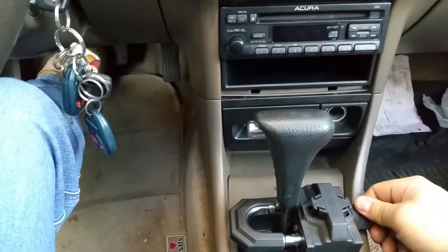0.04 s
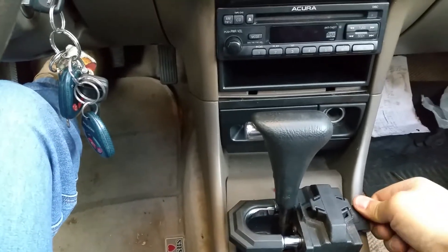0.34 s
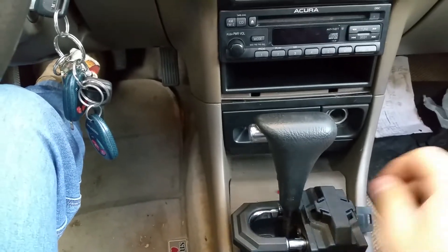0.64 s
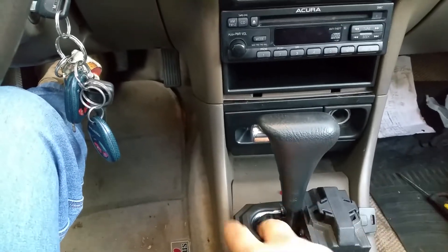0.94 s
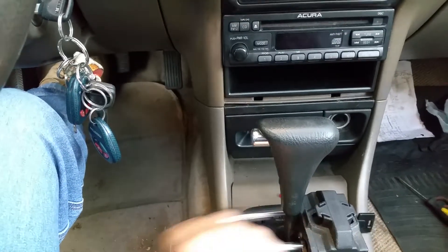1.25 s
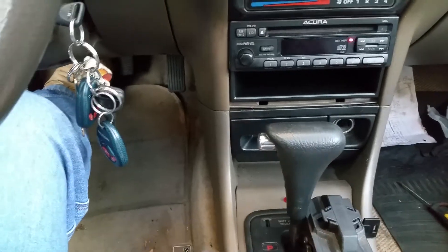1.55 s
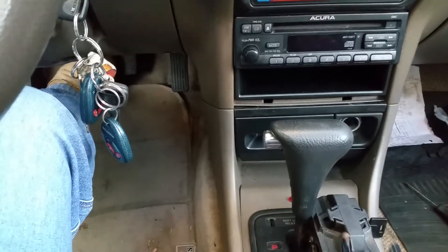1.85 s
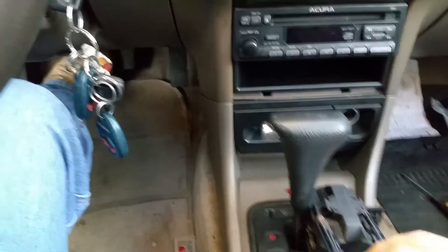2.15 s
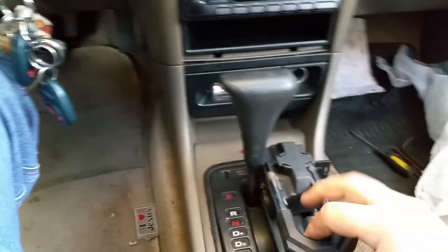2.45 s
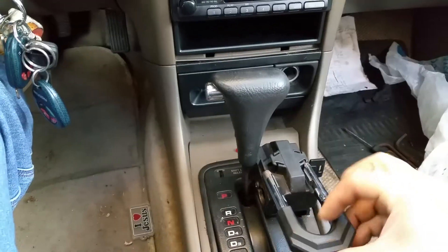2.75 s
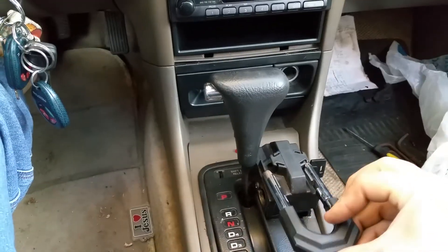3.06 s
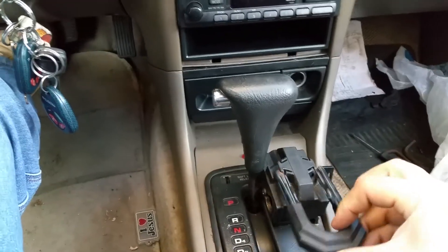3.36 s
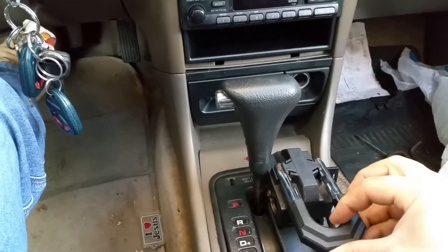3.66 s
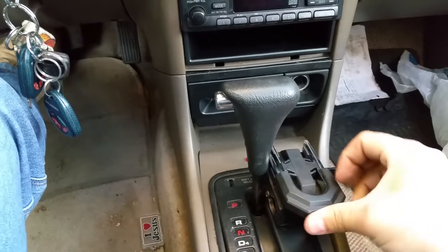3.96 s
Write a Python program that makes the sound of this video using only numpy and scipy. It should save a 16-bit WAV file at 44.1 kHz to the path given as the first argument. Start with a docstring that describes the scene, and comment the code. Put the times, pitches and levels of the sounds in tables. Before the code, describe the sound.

Close, sharp clicks and clacks come from a steel lock being unlocked, pulled off with a knock and slid back together. Between the contacts there is faint rubbing and the low hum of an idling car, heard from inside.

```python
"""Gear-lever lock in an idling car

Inside the cabin, close to a stereo microphone, a key turns and the bolt springs open. The shackle
is pulled off and knocks on the console, then slides back into the lock body and clicks home. Each
contact rings the steel and thuds in the console. Behind it the engine hums through the cabin at
multiples of its firing rate, with a thin whine and a soft hiss."""
import sys
import numpy as np
from scipy import signal
from scipy.fft import rfft, irfft, next_fast_len
from scipy.io import wavfile
from scipy.ndimage import map_coordinates

SR = 44100
rng = np.random.default_rng(int(sys.argv[2]) if len(sys.argv) > 2 else 0)


def to_wav(s):
    """Save 16-bit WAV."""
    ch = np.atleast_2d(s).T  # columns
    pcm = np.round(np.clip(ch, -1, 1) * 32767)  # PCM
    wavfile.write(sys.argv[1], SR, pcm.astype(np.int16))


N = 4 * SR

# how the lock sits in the stereo picture: f/Hz, left over right/dB
LOCK_BALANCE = [(200, 5.5), (450, 1.5), (750, 1), (1300, 5.5), (2400, 10), (3200, 7), (4500, 0.5),
                (6000, 1.5), (7500, -8), (9500, -0.5), (15000, 1)]
# lock noise at the two sides of the microphone: f/Hz, correlation
LOCK_LIKENESS = [(200, 1), (700, 0.87), (2000, 0.14), (4000, -0.22), (12000, 0.0065)]
def lock():
    """All the contacts, close up; their middle range reaches the left side more strongly."""
    noise = white(LOCK_LIKENESS)
    parts = key(noise) + knocks(noise) + latch(noise) + chirp() + bumps(noise) + touches() + thumps()
    pan = lambda hz: np.sqrt(2 / (1 + amp(np.outer([-1, 1], along(LOCK_BALANCE, hz))) ** 2))
    return amp(2.0) * filtered(parts, pan)


# key and bolt contacts: t/s, thud/dB, clack/dB, ring/dB, tick/dB
BOLT_CLICKS = [(.002, -25.5, -20, -26, -29), (.013, -32.5, -22, -25, -22.5), (0.0311, -25, -20, -25, -23.5),
               (.049, -22.5, -31, -25.5, -26.5), (.063, -25, -23, -34, -22), (.073, -20, -18, -26, -38),
               (1.323, -32, -24, -30, -49), (1.329, -33, -21, -24, -17.5), (1.337, -22, -10, -14, -17),
               (1.348, -42, -40, -26, -36)]
# spectrum of their noise: f/Hz, level/dB
BOLT_COLOUR = [(200, 4.5), (400, 5.5), (520, -22), (900, -2.5), (1080, -15.5), (1350, -15), (1600, -4),
               (2400, -1.5), (3100, -4.5), (4000, -10), (6200, -15), (7700, -11.5), (9500, -22),
               (15000, -28.5)]
# modes of key and bolt: f/Hz, level/dB
BOLT_MODES = [(1350, -9.5), (1900, -2), (2200, -5.5), (2470, 0), (2900, -2.5), (3230, -9)]
def key(noise):
    """The key turns in a run of small clicks; later the bolt springs open."""
    return contacts(noise, BOLT_CLICKS, BOLT_COLOUR, BOLT_MODES, ring_t60=0.052)


# shackle against the lever: t/s, thud/dB, clack/dB, ring/dB, tick/dB
SHACKLE_KNOCKS = [(1.387, -10, -8.5, -10.5, -22.5), (1.393, -15, -23, -26, -31),
                  (1.4084, -19.5, -21, -21.5, -37), (1.418, -23, -33, -31, -48)]
# spectrum of their noise: f/Hz, level/dB
SHACKLE_COLOUR = [(200, -16.5), (440, 5.5), (700, -5.5), (1050, -7.5), (1400, -8), (1650, -18),
                  (3200, -17.5), (4200, -17.5), (5500, -19), (7500, -25), (9500, -29.5), (15000, -34)]
# modes of the knocked shackle: f/Hz, level/dB
SHACKLE_MODES = [(1050, -7), (1960, 2), (2290, -1), (2480, 3.5), (2750, -10), (3260, -6.5)]
def knocks(noise):
    """Pulled off, the shackle strikes the lever once hard and three times more lightly."""
    return contacts(noise, SHACKLE_KNOCKS, SHACKLE_COLOUR, SHACKLE_MODES, ring_t60=0.041)


# shackle entering the lock body, then seating home: t/s, thud/dB, clack/dB, ring/dB, tick/dB
ENTRY_CLICKS = [(1.9428, -22.5, -12, -17.5, -17), (1.9471, -22.5, -11.5, -20, -22.5),
                (1.956, -20, -19, -19, -43), (2.008, -25, -29, -21, -29), (2.025, -28, -29, -29, -41),
                (2.151, -23.5, -30, -25, -32.5), (2.165, -24.5, -29, -19.5, -39.5),
                (3.4032, -17.5, -14, -15.5, -36), (3.423, -23, -10, -16.5, -24.5),
                (3.427, -23, -12.5, -24, -25)]
HOME_CLICKS = [(3.917, -18.5, -22, -32, -21.5), (3.9203, -21.5, -16.5, -19, -31)]
# spectrum of their noise: f/Hz, level/dB
BODY_COLOUR = [(200, -3.5), (400, 2), (550, -12), (760, -11), (1100, -15.5), (1400, -13.5), (1900, 1.5),
               (2550, -9.5), (2950, -1.5), (3600, -15.5), (5900, -13), (7500, -19.5), (9000, -25.5),
               (15000, -27)]
# modes of the lock body as the shackle enters, then as it seats: f/Hz, level/dB
BODY_MODES = [(1720, -9), (1800, -2), (1875, -2.5), (1935, -1.5), (2350, -9), (2870, -18.5)]
HOME_MODES = [(1250, -10), (1660, 1.5), (2050, -8), (2900, -13)]
def latch(noise):
    """The shackle clicks its way into the lock body and seats with a lower ring."""
    entering = contacts(noise, ENTRY_CLICKS, BODY_COLOUR, BODY_MODES, ring_t60=0.048)
    return entering + contacts(noise, HOME_CLICKS, BODY_COLOUR, HOME_MODES, ring_t60=0.048)


def chirp(centre_hz=12800, half_width_hz=3000):
    """The hardest latching contacts of the steel shackle add a very high, short ring."""
    times, *_, tick_db = np.transpose(ENTRY_CLICKS + HOME_CLICKS)
    levels = 1.74 * tick_db - 1  # grows faster than the tick
    burst = white(LOCK_LIKENESS) * bursts(times, levels, t60=0.019, tail_db=-12.5, attack_s=0.0003)
    return causal(burst, lambda hz: resonance(hz, centre_hz, half_width_hz))


# low modes of the console under the lock: f/Hz, level/dB
PANEL_MODES = [(275, -2), (390, -1.5), (490, -6.5), (735, -15), (890, -11)]
def contacts(noise, table, colour, modes, ring_t60, clack_from_hz=1370, tick_from_hz=3900):
    """Each contact thuds in the console, clacks and rings in the lock and ticks on the steel."""
    times, thud_db, clack_db, ring_db, tick_db = np.transpose(table)
    thud = noise * bursts(times, thud_db, t60=0.044, tail_db=-5, attack_s=0.00062)
    clack = noise * bursts(times, clack_db, t60=0.014, tail_db=-15, attack_s=0.00036)
    tick = noise * bursts(times, tick_db, t60=0.019, tail_db=-12.5, attack_s=0.0006)
    impact = (amp(-1.5) * band(thud, colour, 176, clack_from_hz)
              + band(clack, colour, clack_from_hz, tick_from_hz)
              + band(tick, colour, tick_from_hz, SR))
    metal = ring(times, ring_db, modes, ring_t60, attack_s=0.00092, scatter_db=1.5)
    console = ring(times, thud_db, PANEL_MODES, t60=0.051, attack_s=0.00061, scatter_db=0)
    return impact + metal + amp(-6) * console


# padded shackle landing on the console: t/s, level/dB
PADDED_BUMPS = [(1.4881, -13.5), (1.510, -27.5)]
# spectrum of the puff: f/Hz, level/dB
PUFF_COLOUR = [(120, -22), (260, -11), (400, 6), (520, -3), (680, -11), (870, -11.5), (1400, -12.5),
               (2200, -18), (3500, -30.5), (15000, -54)]
def bumps(noise):
    """The padding lands softly: a dull puff and the low modes of the console."""
    times, levels = np.transpose(PADDED_BUMPS)
    burst = noise * bursts(times, levels, t60=0.05, tail_db=-5, attack_s=0.00087)
    puff = causal(burst, lambda hz: amp(along(PUFF_COLOUR, hz)))
    console = ring(times, levels, PANEL_MODES, t60=0.051, attack_s=0.00074, scatter_db=1.5)
    return amp(-2.5) * puff + amp(-1) * console


# the lever giving: t/s, f/Hz, level/dB
LEVER_THUMPS = [(1.419, 199.4, -24.5), (1.956, 268, -24.5), (3.437, 217, -20), (3.936, 233, -24)]
def thumps():
    """Pushed by the lock, the lever gives and answers with a low, dull note."""
    return sum(ring([s], [db], [(hz, 0)], t60=0.079, attack_s=0.0029, scatter_db=2)
               for s, hz, db in LEVER_THUMPS)


# fingers and key on the lock: t/s, f/Hz, level/dB
LIGHT_TOUCHES = [(.546, 2790, -33), (0.55, 5500, -39), (1.225, 1610, -38), (2.333, 2640, -38),
                 (2.458, 8750, -55), (3.975, 1900, -33.5)]
def touches(sharpness=4.9):
    """Light touches near the microphone, each a brief burst in one broad resonance."""
    noise, out = white(LOCK_LIKENESS), np.zeros((2, N))
    for s, centre_hz, db in LIGHT_TOUCHES:
        burst = noise * bursts([s], [db], t60=0.049, tail_db=-12.5, attack_s=0.0025)
        out += causal(burst, lambda hz: resonance(hz, centre_hz, centre_hz / sharpness))
    return out


# shackle rubbing in the lock body: start/s, peak/s, end/s, level/dB
SHACKLE_SCRAPES = [(1.283, 1.336, 1.35, -35.5), (3.217, 3.434, 3.595, -46.5), (3.758, 3.904, 4.06, -44)]
def scraping(half_width_hz=190, rough_db=3):
    """The shackle rubs in the lock body in uneven catches that keep its modes ringing."""
    level = sum(amp(db) * swell(*times) ** 2 for *times, db in SHACKLE_SCRAPES)
    body = lambda hz: sum(amp(db) * resonance(hz, centre, half_width_hz) for centre, db in BODY_MODES)
    rub = rush(RUB_COLOUR)
    ringing = amp(1) * unit(filtered(white(LOCK_LIKENESS), body))
    return level * amp(rough_db * wobble(130)) * (rub + ringing)


# hand and metal sliding: start/s, peak/s, end/s, level/dB
HAND_SLIDES = [(0.493, 0.553, 0.69, -48), (0.587, 0.867, 1.61, -48), (1.53, 1.774, 1.91, -49.5),
               (2.7, 2.857, 2.87, -54)]
# spectrum of the friction: f/Hz, level/dB
RUB_COLOUR = [(300, -17), (1000, -2), (2500, -1), (4500, -4), (7000, -8.5), (9000, -13.5), (15000, -14.5)]
def sliding():
    """Soft, uneven rubbing, close by, that swells and fades as the hand moves."""
    level = sum(amp(db) * swell(*times) for *times, db in HAND_SLIDES)
    return level * amp(1.1 * wobble(76)) * rush(RUB_COLOUR)


# engine harmonics inside the car: multiple of the firing rate, level/dB
ENGINE_ORDERS = [(1, -16), (2, -6), (3, -1), (4, -2.5), (5, -15), (6, -24), (8, -17), (10, -25),
                 (12, -26.5), (14, -28.5)]
# course of the hum: t/s, relative level/dB
HUM_LEVEL = [(0, -24.5), (1.28, -24), (1.36, -29), (1.62, -23.5), (1.72, -28.5), (2.25, -28), (2.5, -25),
             (4, -24.5)]
# spectrum of the rumble: f/Hz, level/dB
IDLE_COLOUR = [(15, 9), (30, -23), (55, 3.5), (110, -1), (170, -0.5), (260, -28.5), (500, -56)]
def engine(firing_hz=30.95, smear_turns=0.21):
    """The idle from inside: firing harmonics, smeared by the cabin into a smooth hum, over a rumble."""
    turns = firing_hz * np.arange(N) / SR + 0.011 * wobble(2.995)
    harmonics = sum(amp(db) * np.sin(2 * np.pi * (k * turns + smear_turns * k * k))
                    for k, db in ENGINE_ORDERS)
    hum_db = curve(HUM_LEVEL)
    rumble = amp(-34 + hum_db - hum_db.mean() + 2.1 * wobble(5.3)) * rush(IDLE_COLOUR)
    hum = amp(hum_db + 1 + 0.4 * wobble(7)) * unit(harmonics)
    return (hum + rumble) * amp([[0.55], [-0.55]])  # slightly left


# course of the cabin noise and of the whine: t/s, relative level/dB
HISS_LEVEL = [(0, -43.5), (1.4, -43), (1.7, -46), (2.2, -47.5), (2.5, -44), (3.3, -44), (3.7, -45.5)]
WHINE_LEVEL = [(0, -49), (.35, -55.5), (1, -57), (1.6, -56), (2.1, -64), (2.7, -55), (3.1, -58), (3.6, -67)]
# spectrum of the cabin noise: f/Hz, level/dB
HISS_COLOUR = [(130, -6.5), (200, 2), (420, -3.5), (600, -8), (900, -7.5), (1300, -14.5), (2300, -13.5),
               (3300, -21.5), (5000, -30), (7000, -34.5), (9000, -41), (16000, -43)]
def cabin(whine_hz=2182, wander_hz=12.2):
    """Room tone of the running car: soft broad noise and a thin whine that wanders in pitch."""
    pitch_hz = whine_hz + wander_hz * wobble(40)
    tone = unit(np.sin(2 * np.pi * np.cumsum(pitch_hz) / SR))
    hiss = amp(curve(HISS_LEVEL) + 3.5 + 0.91 * wobble(9.6)) * rush(HISS_COLOUR)
    whine = amp(curve(WHINE_LEVEL) + 2.4 * wobble(7.97)) * tone
    return (hiss + whine) * amp([[0.8], [-0.8]])  # slightly left


# cabin sound at the two sides of the microphone: f/Hz, correlation
CABIN_LIKENESS = [(100, 0.83), (500, 0.53), (1500, 0)]
def rush(colour):
    """Steady coloured noise of rms 1, central in the bass and wide in the treble."""
    return unit(filtered(white(CABIN_LIKENESS), lambda hz: amp(along(colour, hz))))


def white(likeness):
    """Stereo white noise whose two sides are partly alike."""
    def mid_side(hz):
        angle = np.arccos(np.clip(along(likeness, hz), -1, 1)) / 2
        return np.array([np.cos(angle), np.sin(angle)])
    mid, side = filtered(rng.standard_normal((2, N)), mid_side)
    return unit(np.array([mid + side, mid - side]))


def bursts(times, levels, t60, tail_db, attack_s, cabin_t60=0.092):
    """Envelope of contacts: a fall of 60 dB in t60 seconds, then the short answer of the cabin."""
    t, power = np.arange(SR // 3) / SR, np.zeros(N + SR)
    direct, tail = amp(-60 * t / t60), amp(tail_db - 60 * t / cabin_t60)
    shape = (direct ** 2 + tail ** 2) * (1 - np.exp(-t / attack_s)) ** 2
    for s, db in zip(times, levels):
        power[max(0, round(s * SR)):][:len(t)] += amp(db) ** 2 * shape
    return np.sqrt(power[:N])


def ring(times, levels, modes, t60, attack_s, scatter_db):
    """Every contact rings the modes anew, nearly in step, each time a little differently."""
    t, out = np.arange(SR // 10) / SR, np.zeros(N + SR)
    hz, mode_db = np.transpose(modes)[:, :, None]
    rms = np.sqrt(np.sum(amp(mode_db) ** 2) / 2)
    decay = amp(mode_db - 60 * t / t60) * (1 - np.exp(-t / attack_s)) / rms
    for s, db in zip(times, levels):
        size, detune, phase = rng.standard_normal((3, len(modes), 1))
        waves = np.sin(2 * np.pi * hz * (1 + 0.012 * detune) * t + 0.8 * phase)
        strike = np.sum(amp(db + scatter_db * size) * decay * waves, axis=0)
        out[max(0, round(s * SR)):][:len(t)] += strike
    return out[:N]


def band(x, colour, low_hz, high_hz):
    """x coloured and confined between two steep edges."""
    above = lambda hz, edge: (hz / edge) ** 6 / np.sqrt(1 + (hz / edge) ** 12)
    below = lambda hz, edge: np.sqrt(np.abs(1 - above(hz, edge) ** 2))
    return causal(x, lambda hz: amp(along(colour, hz)) * above(hz, low_hz) * below(hz, high_hz))


def causal(x, gain, size=2048):
    """x through a minimum-phase filter of unit energy, so nothing sounds ahead of a contact."""
    magnitude = np.maximum(gain(np.fft.rfftfreq(size, 1 / SR)), 1e-6)
    cepstrum = irfft(np.log(magnitude))
    cepstrum[1:size // 2] *= 2
    cepstrum[size // 2 + 1:] = 0
    impulse = irfft(np.exp(rfft(cepstrum)))
    return signal.oaconvolve(x, impulse[None] / np.linalg.norm(impulse), axes=1)[:, :N]


def filtered(x, response):
    """x with its spectrum multiplied by response(hz)."""
    size = next_fast_len(N + SR // 2)
    return irfft(rfft(x, size) * response(np.fft.rfftfreq(size, 1 / SR)), size)[..., :N]


def resonance(hz, centre_hz, half_width_hz):
    """Gain of one resonant peak."""
    return 1 / (1 + ((hz - centre_hz) / half_width_hz) ** 2)


def wobble(rate):
    """A smooth random curve, rate knots a second."""
    return map_coordinates(rng.standard_normal(int(N * rate / SR) + 4), [np.arange(N) * rate / SR])


def swell(start, peak, end):
    """A straight rise to 1 and fall to 0."""
    return curve([(start, 0), (peak, 1), (end, 0)])


def curve(rows):
    """One value per sample from (t/s, value) rows."""
    return np.interp(np.arange(N) / SR, *np.transpose(rows))


def along(rows, hz):
    """(f/Hz, value) rows interpolated on a log axis."""
    knots_hz, values = np.transpose(rows)
    return np.interp(np.log(hz + 1), np.log(knots_hz + 1), values)


def amp(db):
    """Decibels to gain."""
    return 10 ** (np.asarray(db) / 20)


def unit(x):
    """Scale to rms 1."""
    return x / np.sqrt(np.mean(x ** 2) + 1e-20)


def scene():
    """The lock in the foreground, the idling car all around."""
    return lock() + sliding() + scraping() + engine() + cabin()


def record(dry, ceiling=0.95, top_hz=16000):
    """The microphone chain rounds off the highest peaks and keeps nothing above its band limit."""
    rounded = dry / (1 + np.abs(dry / ceiling) ** 6) ** (1 / 6)
    return signal.sosfilt(signal.ellip(10, 0.1, 90, top_hz, fs=SR, output="sos"), rounded)


dry = scene()
out = record(dry)
to_wav(out)
```